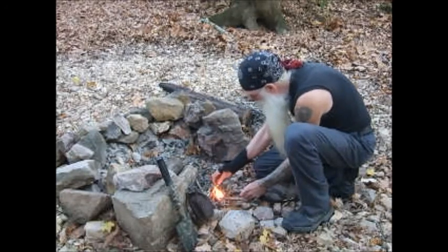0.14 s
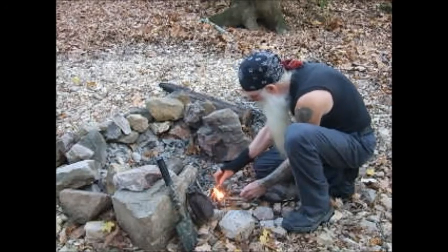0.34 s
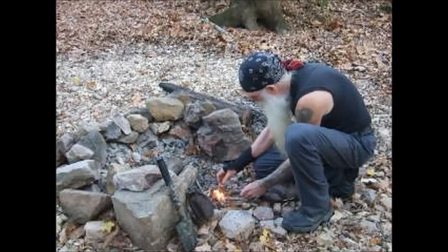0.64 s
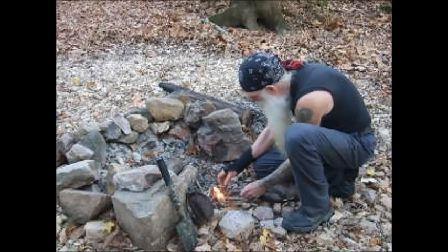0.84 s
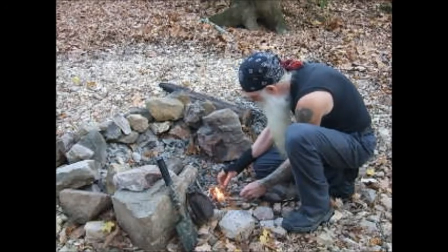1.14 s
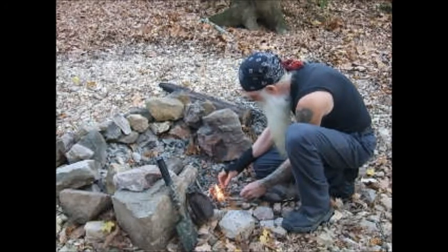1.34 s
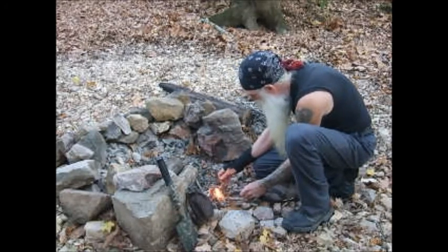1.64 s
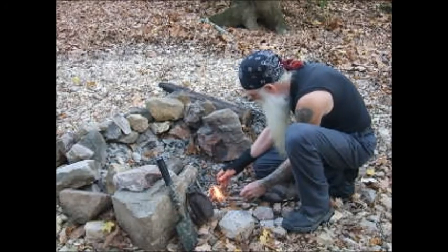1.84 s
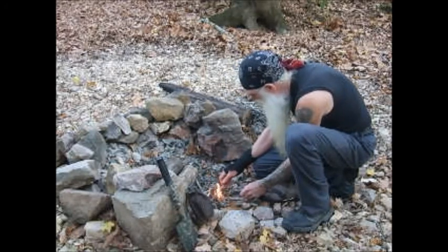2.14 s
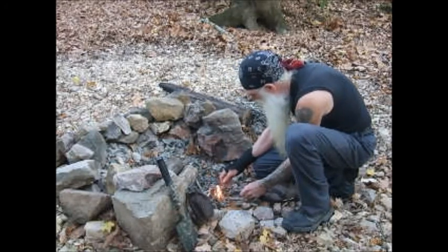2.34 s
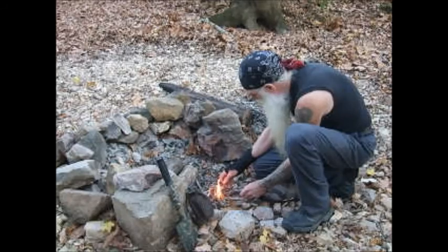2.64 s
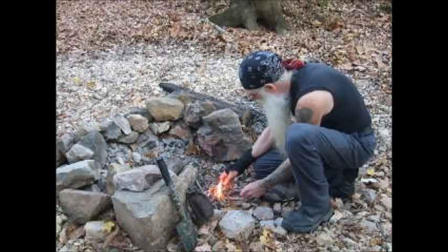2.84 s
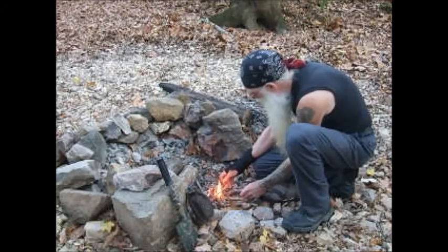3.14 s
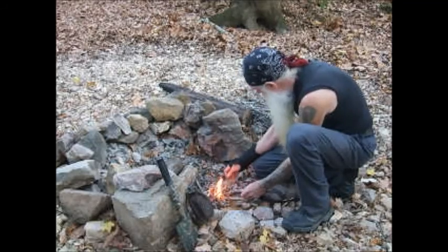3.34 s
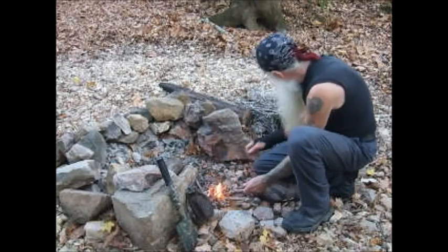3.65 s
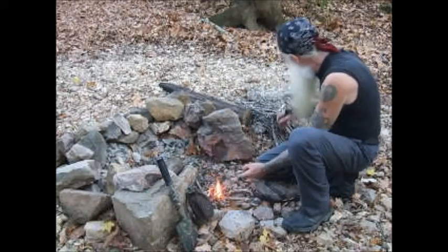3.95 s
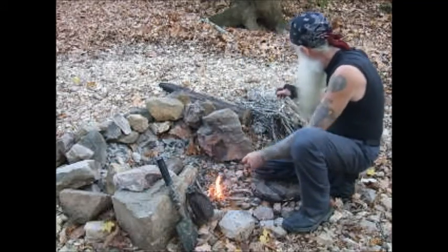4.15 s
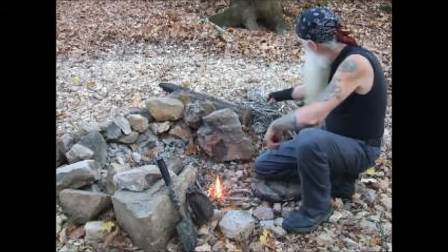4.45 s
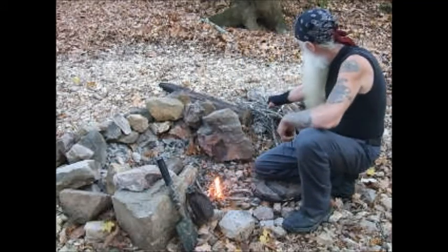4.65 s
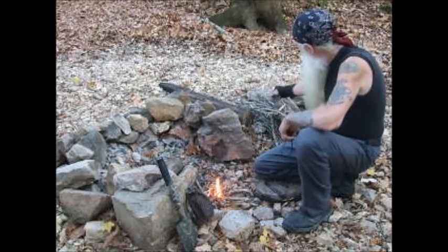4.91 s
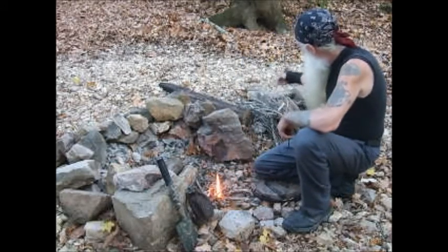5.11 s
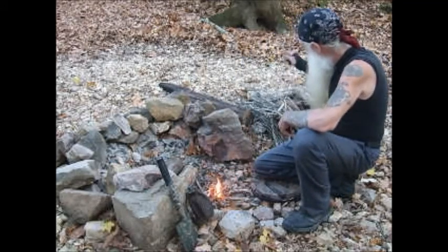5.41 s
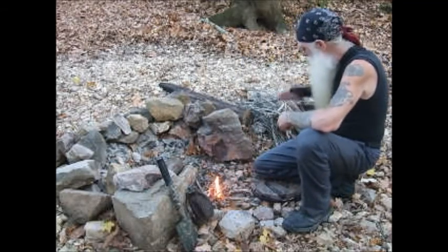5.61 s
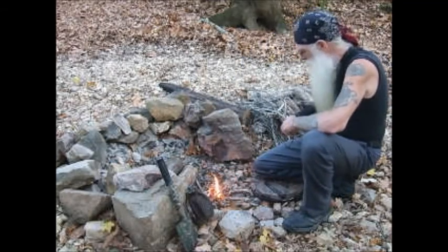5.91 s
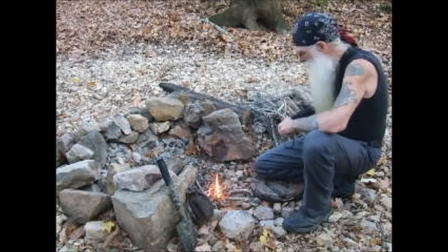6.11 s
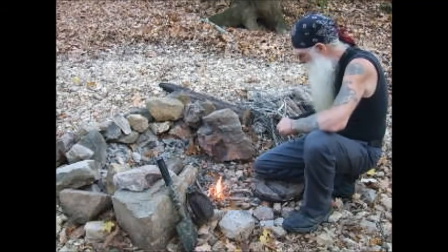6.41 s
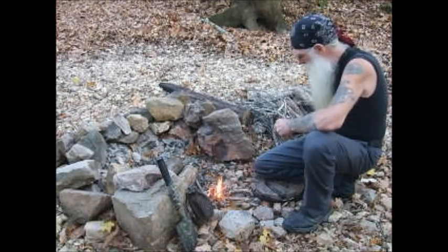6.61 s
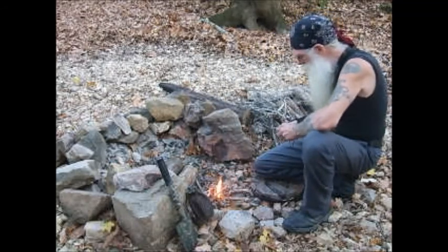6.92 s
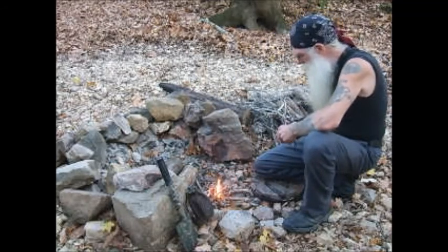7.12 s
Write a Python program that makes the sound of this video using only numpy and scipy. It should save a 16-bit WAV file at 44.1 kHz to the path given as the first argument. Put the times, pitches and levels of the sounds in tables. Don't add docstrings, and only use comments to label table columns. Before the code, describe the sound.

A constant high cricket shimmer fills the place, near insects distinct and far ones smeared together. Beside a small campfire, hands stir leaves and kindling; sparse clicks and a dull knock come first, then a dense run of brittle ticks past the middle. A faint bird whistles now and again. Late on, a hard twig crack bursts out with a short woodland echo. Dull-topped, hissy microphone close to the fire.

```python
import sys
import numpy as np
from scipy import signal
from scipy.fft import rfft, irfft, next_fast_len
from scipy.io import wavfile
from scipy.ndimage import uniform_filter1d

SR = 44100
rng = np.random.default_rng(int(sys.argv[2]) if len(sys.argv) > 2 else 0)


def wav_record(signal):
    frames = np.transpose(np.atleast_2d(signal))
    bounded = np.clip(frames, -1, 1)
    quanta = np.round(bounded * 32767).astype(np.int16)
    wavfile.write(sys.argv[1], SR, quanta)


def gain_from_db(level_db):
    decades = np.asarray(level_db, float) / 20
    return 10 ** decades


N = 320607

# first wing stroke in seconds, end in seconds, strokes per second, wing pitch in Hz.
HIGH_TRILLS = [(.107, .48, 38.1, 4250), (.595, .72, 38.8, 4240), (.727, .98, 40, 4250),
               (.996, 1.42, 39.3, 4320), (1.638, 2.06, 39, 4240), (2.208, 2.44, 39.1, 4310),
               (2.453, 2.8, 38.1, 4260), (3.04, 3.36, 40.5, 4180), (3.588, 3.92, 39.7, 4300),
               (3.94, 4.5, 38.8, 4250), (4.602, 4.88, 39.1, 4230), (4.934, 5.35, 39.8, 4310),
               (5.689, 6.3, 39.3, 4250), (6.345, 6.72, 39.5, 4330), (7.097, 7.33, 37.9, 4240)]
LOW_TRILLS = [(.01, .45, 39.1, 4080), (.873, 1.2, 38.4, 4090), (1.473, 1.75, 37.4, 4040),
              (1.818, 2.16, 38.1, 4080), (2.321, 2.7, 40.9, 4100), (2.714, 3, 37.4, 4080),
              (2.995, 3.2, 40.9, 4060), (3.566, 3.86, 39.9, 4070), (3.968, 4.5, 38.9, 4110),
              (4.513, 4.88, 41.5, 4050), (4.907, 5.25, 38.5, 4130), (5.269, 5.65, 41.6, 4050),
              (5.814, 6.15, 38.8, 4100), (6.402, 6.86, 39.6, 4150), (6.934, 7.33, 40.2, 4060)]
DEEP_TRILLS = [(1.061, 1.46, 38.4, 3700), (3.573, 3.9, 38.5, 3680), (5.559, 5.93, 38.1, 3690),
               (6.986, 7.33, 38.2, 3690)]
# pitch in Hz, level in dB per Hz.
LEAF_COLOUR = [(3600, -41.5), (4600, -1.5), (5400, -3), (6200, -1), (7200, 3.5), (7900, -4.5), (8600, -44)]


def evened(x):
    return x / np.sqrt(np.mean(x ** 2) + 1e-20)


def read(points, hz):
    f, value = np.transpose(points)
    return np.interp(np.log(hz + 1), np.log(f + 1), value)


def coloured(x, points):
    size = next_fast_len(len(x))
    gain = gain_from_db(read(points, np.fft.rfftfreq(size, 1 / SR)))
    return evened(irfft(rfft(x, size) * gain, size)[:len(x)])


def add(mix, s, sound):
    part = mix[round(s * SR):][:len(sound)]
    part += sound[:len(part)]


def ring(hz, t60, rise=.0002):
    t = np.arange(1500) / SR
    return (1 - np.exp(-t / rise)) * gain_from_db(-60 * t / t60) * np.sin(2 * np.pi * hz * t)


def wander(smooth_s):
    size = round(smooth_s * SR)
    return evened(uniform_filter1d(uniform_filter1d(rng.standard_normal(N), size), size))


def wood(x):
    # pitch in Hz, time to drop 60 dB in seconds.
    echo_times = [(500, 0.16), (3000, 0.47), (5500, 0.72), (8000, 0.71)]
    taps = np.zeros(SR // 2)
    at = np.arange(200, SR // 2 - 20, 20)
    taps[at + rng.integers(0, 20, len(at))] = rng.choice([-1., 1.], len(at))
    hz, t, z = signal.stft(taps, SR, nperseg=256)
    fade = gain_from_db(-60 * t / read(echo_times, hz)[:, None])
    tail = signal.istft(z * fade, SR, nperseg=256)[1]
    return signal.fftconvolve(x, tail / np.linalg.norm(tail))[:N]


def strokes(t, rate, hz, restart):
    stroke = np.clip(t * rate % 1 / .88, 0, 1)
    arch_hz = 80 * np.sin(np.pi * stroke ** .8) - 100 * stroke + 10
    fresh = restart[(t * rate).astype(int)]
    pressure = np.sin(np.pi * stroke ** .7) ** .6
    return pressure * np.sin(2 * np.pi * (fresh + np.cumsum(hz + arch_hz) / SR))


def crickets():
    # its trills, the level of each trill in dB, how much a neighbour sings between the strokes
    # from 0 to 1, tiring over a trill in dB.
    groups = [
        (HIGH_TRILLS, [-41.5, -48, -41.5, -39, -36, -39.5, -37.5, -36, -40, -38, -48.5, -39.5, -39, -39, -37.5], 0.22, -1.3),
        (LOW_TRILLS, [-39, -41.5, -43.5, -36.5, -40, -40.5, -39, -38.5, -43.5, -42, -35.5, -49, -33.5, -36.5, -44.5], 0.29, -1.8),
        (DEEP_TRILLS, [-48.5, -49.5, -49.5, -49], 0.5, -1.5),
    ]
    slack_hz, tighten_s = 70, .07
    sag_hz_per_s = 70

    out, waver, uneven = np.zeros(N), wander(.003), wander(.012)
    trills = []
    for rows, levels, share, tire_db in groups:
        for row, db in zip(rows, levels):
            trills.append((*row, db, share, tire_db))
    restart = rng.random((len(trills), 2, 30))
    for k, (start, end, rate, hz, db, share, tire_db) in enumerate(trills):
        t = np.arange(0, end - start, 1 / SR)
        own = (np.arange(len(t)) + k * 9001) % N
        hz = hz - slack_hz * np.exp(-t / tighten_s) - sag_hz_per_s * t
        lead = strokes(t, rate, hz + 12 * waver[own], restart[k, 0])
        neighbour_hz = hz - 30 + 12 * waver[own][::-1]
        neighbour = strokes(t + .5 / rate, .98 * rate, neighbour_hz, restart[k, 1])
        level_db = db + tire_db * (t / t[-1] - .5) + 1.4 * uneven[own]
        fade = np.clip(np.minimum(t / .06 + 0.69, (t[-1] - t) / 0.035), 0, 1)
        add(out, start, 1.723 * gain_from_db(level_db) * fade * (lead + share ** 1.3 * neighbour))
    return out + gain_from_db(-8.5) * wood(out)


def chorus():
    # time in seconds, level in dB.
    swells = [(0, -41.5), (.5, -40.5), (1, -43), (1.5, -41), (2.2, -43), (2.9, -41), (3.35, -42),
              (3.45, -47), (3.6, -41.5), (4.5, -39), (4.9, -40.5), (5.5, -39), (6.2, -41.5), (6.3, -42.5),
              (6.9, -43), (7.27, -44)]
    # pitch in Hz, width in Hz, level in dB.
    wing_bands = [(4030, 190, -3), (4177, 110, -5), (4535, 660, -8), (3650, 360, -22)]
    s, level_db = np.transpose(swells)
    hz = np.geomspace(2500, 7000, 300)
    shape = sum(gain_from_db(db) * np.exp(-((hz - f) / width) ** 2) for f, width, db in wing_bands)
    blur = coloured(rng.standard_normal(N), np.c_[hz, 20 * np.log10(shape + 1e-5)])
    return gain_from_db(np.interp(np.arange(N) / SR, s, level_db) + 0.5 * wander(0.0051)) * blur


def twigs():
    # start in seconds, peak in dB, ring in Hz, low knock against the tick in dB.
    clear_ticks = [(0.707, -29.5, 6460, -21), (0.9888, -24, 7400, -10.5), (3.849, -27, 7060, -24),
                   (3.8974, -23.5, 6950, -21), (3.9545, -30, 6690, -18), (3.9716, -24, 6690, -24),
                   (4.028, -21.5, 7000, -27), (4.188, -26.5, 7000, -17), (4.248, -27, 7200, -26),
                   (4.617, -25, 7260, -19), (4.6977, -15, 7100, -23), (4.7692, -17, 7100, -21),
                   (4.8211, -24.5, 7250, -22), (4.869, -15, 6070, -26), (4.9217, -24, 7170, -21),
                   (4.9443, -18.5, 6260, -22), (4.9852, -22.5, 7100, -20), (5.2162, -29, 6410, -11),
                   (5.2346, -27, 5250, -8), (5.2665, -21, 5870, -14), (5.3643, -25, 7100, -25),
                   (5.6713, -19.5, 6940, -27), (5.715, -24, 7180, -17), (5.741, -30, 7200, -25),
                   (5.91, -21, 5380, -14), (6.3296, -28, 6900, -20), (6.3494, -30, 7110, -20),
                   (6.499, -23, 7100, -26.5), (6.625, -22.5, 7300, -13), (6.7197, -23.5, 7100, -20)]
    # start in seconds, peak in dB, ring in Hz.
    pops = [(0.8774, -32.5, 7050), (0.9937, -27, 7200), (1.0044, -24, 4900), (1.0234, -30, 6920),
            (1.9965, -31, 6450), (2.0485, -28, 6550), (2.37, -35, 5070), (3.3704, -30, 5030),
            (3.4286, -35, 6540), (3.4623, -33, 6700), (3.7883, -36.5, 4930), (4.0577, -30, 6660),
            (4.1669, -32, 6310), (4.3704, -33, 6620), (4.6998, -18, 7040), (4.9027, -27, 5900),
            (5.016, -27, 5950), (5.1327, -25, 7260), (5.4218, -28.5, 7190), (5.694, -31, 7080),
            (5.7004, -24, 6160), (5.7538, -26.5, 6760), (5.8596, -34, 6480), (6.0786, -31, 7060),
            (6.1873, -31.5, 6420), (6.5231, -33, 7260), (6.5695, -28.5, 7060), (6.7805, -31, 7640),
            (6.8139, -32, 7390)]
    # start in seconds, peak in
    # dB, ring in Hz, 60 dB fade in seconds.
    knocks = [(.9905, -24.5, 3320, 0.0099), (1.0049, -16, 2900, 0.0038), (1.0055, -27, 5200, .003),
              (1.006, -35, 7400, 0.007), (3.424, -41, 194, 0.039), (3.44, -41, 1020, 0.022),
              (3.464, -32.5, 1610, 0.0087), (5.049, -41.5, 955, 0.025), (5.1, -45, 1980, 0.033),
              (5.237, -25, 3130, 0.0073), (5.237, -36, 1550, 0.048), (5.269, -29, 2770, 0.0066),
              (5.288, -39.5, 1040, 0.059), (5.284, -34, 2660, 0.036), (5.716, -29.5, 2900, .006),
              (5.9119, -30.5, 2970, 0.0088)]
    pop_knock_db = -16.5

    out = np.zeros(N)
    ticks = list(clear_ticks) + [(*row, pop_knock_db) for row in pops]
    for (s, db, hz, low_db), (a, b, c) in zip(ticks, rng.random((len(ticks), 3))):
        s = s + .0007
        add(out, s, gain_from_db(db + 5) * ring(hz, .0045, 0.00032))
        add(out, s, gain_from_db(db + 3) * ring(5200 + 1200 * a, .0016, .0001))
        add(out, s + .0008 + .002 * b, gain_from_db(db - 6) * ring(hz * (.85 + .2 * c), .005))
        add(out, s, gain_from_db(db + low_db + 3.5) * ring(2200 + 1000 * c, 0.0045))
    for s, db, hz, t60 in knocks:
        add(out, s, gain_from_db(db) * (ring(hz, t60, .0001) + .5 * ring(0.78 * hz, 0.0023)))
    return out + gain_from_db(-12) * wood(out)


def crackle(per_s, lo_hz, hi_hz, t60):
    happens = rng.random(N) < per_s / SR
    size = gain_from_db(3 * np.minimum(rng.exponential(1, N), 4)) * happens
    kind = rng.integers(0, 8, N)
    cracks = np.zeros(N)
    for k, hz in enumerate(np.geomspace(lo_hz, hi_hz, 8)):
        cracks += signal.oaconvolve(size * (kind == k), ring(hz, t60)[:500])[:N]
    fizz = 1.1 * rng.standard_normal(N)
    return (evened(cracks) + fizz) * gain_from_db(1.8 * wander(.008))


def rustle():
    # middle in seconds, length in seconds, leaf rustle in dB, stick scrape in dB.
    movements = [(0.141, 0.036, -37.5, -41), (1.002, 0.031, -38, -46), (1.654, 0.11, -49, -49),
                 (3.434, 0.13, -44.5, -45.5), (3.483, 0.1, -36.5, -41), (3.574, 0.096, -40.5, -49),
                 (3.722, 0.14, -48, -52), (3.972, 0.24, -44.5, -55), (4.118, .07, -48, -56),
                 (4.234, 0.15, -41.5, -52), (4.37, 0.23, -47, -55), (4.677, 0.22, -39.5, -47),
                 (4.798, 0.1, -42, -48.5), (4.926, 0.19, -41.5, -46.5), (5.088, 0.56, -42.5, -49),
                 (5.23, 0.2, -37.5, -42), (5.387, 0.15, -43, -50), (5.726, .14, -49, -54),
                 (5.918, 0.087, -45, -51), (6.52, 0.18, -43.5, -63), (6.614, 0.13, -39.5, -57)]
    # pitch in Hz, level in dB per Hz.
    stick_colour = [(59, -35), (100, -13.5), (411, -15.5), (692, -15), (1710, -9), (3500, 0), (4550, -31),
                    (7700, -120)]
    s, length, leaf_db, stick_db = np.transpose(movements)
    t = np.arange(0, N, 64) / SR
    swell = np.exp(-abs(2 * (t[:, None] - s) / length) ** 1.55 * 1.35)

    def loudness(db, still_db):
        strongest = (swell * gain_from_db(db)).max(1)
        return np.interp(np.arange(N) / SR, t, np.maximum(strongest, gain_from_db(still_db)))

    leaves = loudness(leaf_db, -55.5) * coloured(crackle(1500, 4750, 8100, 0.0064), LEAF_COLOUR)
    sticks = loudness(stick_db, -62) * coloured(crackle(900, 616, 3720, 0.0046), stick_colour)
    return leaves + gain_from_db(-2) * sticks


def snap():
    # pitch in Hz, level in dB, time to drop 60 dB in seconds.
    rings = [(250, -17, 0.0063), (2120, -21.5, 0.003), (2900, -9.5, 0.0033), (3500, -6, .003),
             (5020, 2.5, 0.0029), (5460, -11, 0.0055), (6230, -4, 0.0056), (7490, -5, 0.0071)]
    # delay in seconds, level in dB.
    stone_echoes = [(.0010, -17.5), (.0017, -17), (.0025, -24), (.0031, -19), (.0039, -25), (.0055, -27),
                    (.0073, -32), (.012, -20), (0.021, -31)]
    start_s, level_db = 6.87468, 3
    out, scattered = np.zeros(N), np.zeros(N)
    crack = sum(gain_from_db(db) * ring(hz, t60, .00008) for hz, db, t60 in rings)
    no_bass = signal.butter(1, 1500, "high", fs=SR, output="sos")
    crack = signal.sosfilt(no_bass, crack)
    add(out, start_s, gain_from_db(level_db) * crack)
    bright_echo = evened(np.gradient(crack)) * np.std(crack)
    for delay, db in stone_echoes:
        add(out, start_s + delay, gain_from_db(level_db + db) * bright_echo)
    click = np.zeros(200)
    click[100] = 1
    add(scattered, start_s, gain_from_db(level_db - 6) * coloured(click, LEAF_COLOUR) / 10)
    return out + wood(scattered)


def bird():
    # start in seconds, length in seconds, first pitch in Hz, glide in Hz, level in dB.
    calls = [
        (1.64, 0.066, 7720, -80.5, -43.5),
        (3.92, 0.14, 6450, 262, -51.5),
        (4.325, .17, 6440, 333, -46.5),
        (4.5, .1, 6700, 10, -58.5),
        (5.885, .13, 5360, -60, -48),
    ]
    rise_s, fade_db = 0.0073, -7.5
    out, waver = np.zeros(N), wander(0.0025)
    for s, length, hz, glide_hz, db in calls:
        t = np.arange(0, length, 1 / SR)
        pitch_hz = hz + glide_hz * t / length + 40 * waver[:len(t)]
        tone = np.sin(2 * np.pi * np.cumsum(pitch_hz) / SR)
        edges = np.clip(np.minimum(t, length - t) / rise_s, 0, 1)
        add(out, s, np.sqrt(2) * gain_from_db(db + fade_db * t / length) * edges * tone)
    return out + gain_from_db(-5) * wood(out)


def hiss_and_air():
    # pitch in Hz, level in dB per Hz.
    hiss_colour = [(12, -32.5), (20, -9), (34, -6.5), (54, -10), (789, -10), (1380, -12), (3400, -10.5),
                   (4420, -53.5)]
    # pitch in Hz, level in dB per Hz.
    air_colour = [(4420, -54.5), (5300, -10), (5740, -12.5), (7590, -9.5), (7980, -19), (8390, -20),
                  (8600, -46.5), (11200, -75.5)]
    return gain_from_db(-49.5) * coloured(rng.standard_normal(N), hiss_colour + air_colour[1:])


def scene():
    creatures = crickets() + chorus() + bird()
    fireside = twigs() + rustle() + snap()
    return (creatures + fireside + hiss_and_air())[None]


def thin_out(x):
    thin_moments = [.08, .14, .61, .83, .95, 1.36, 1.4, 1.51, 2.15, 2.21, 3.492, 5.2, 5.285, 5.585, 6.5,
                    6.605, 7.035]
    empty_moments = [.52]
    hz, t, z = signal.stft(x, SR, nperseg=512, noverlap=384)
    bands = (17 * np.log(hz / 700 + 1)).astype(int)
    loss_db = np.zeros(z.shape[1:])
    moments = [(s, 15) for s in thin_moments] + [(s, 30) for s in empty_moments]
    chance = np.where(np.arange(70) < 32, .62, .3)
    lost_bands = rng.random((len(moments), 70)) < chance
    for (s, db), lost in zip(moments, lost_bands):
        gone = lost[bands] & (abs(hz - 4150) > 450)
        loss_db += db * np.outer(gone, np.exp(-((t - s) / .012) ** 4))
    return signal.istft(z * gain_from_db(-loss_db), SR, nperseg=512, noverlap=384)[1][:, :N]


def roll_off(x):
    return signal.sosfilt(signal.butter(12, 16000, fs=SR, output="sos"), x)


def record(dry):
    power_db = 10 * np.log10(abs(uniform_filter1d(dry[0] ** 2, 400)) + 1e-12)
    fall = np.arange(N) * 6.1 / SR
    held = np.maximum.accumulate(.3 * (power_db + 24) + fall)
    over_db = np.maximum(held - fall, 0)
    ducked = dry / gain_from_db(np.roll(uniform_filter1d(over_db, 300), 500))
    band_limit = signal.firwin(401, 8056, window=("kaiser", 9), fs=SR)
    narrow = signal.oaconvolve(thin_out(ducked), band_limit[None], "same")
    mix = np.clip(narrow - .0036, -1.02, 1.02)
    return roll_off(mix)


dry = scene()
out = record(dry)
wav_record(out)
```